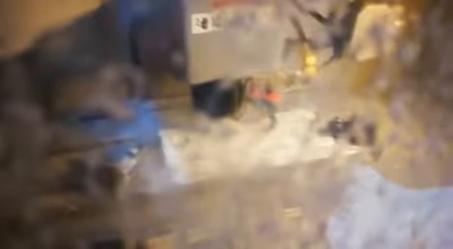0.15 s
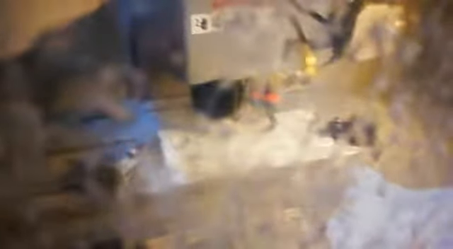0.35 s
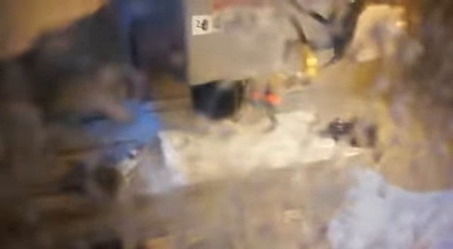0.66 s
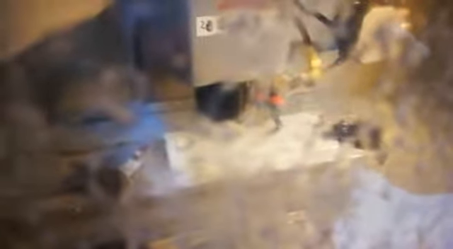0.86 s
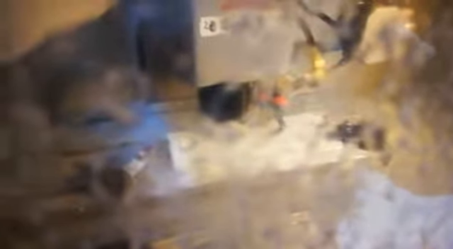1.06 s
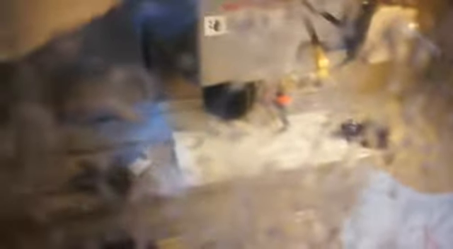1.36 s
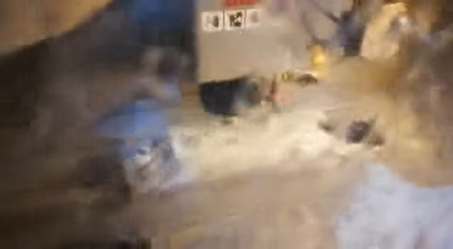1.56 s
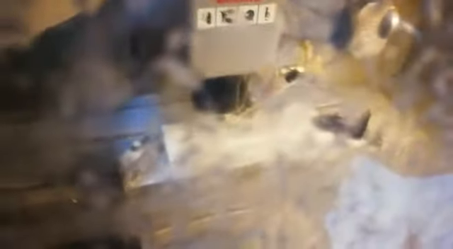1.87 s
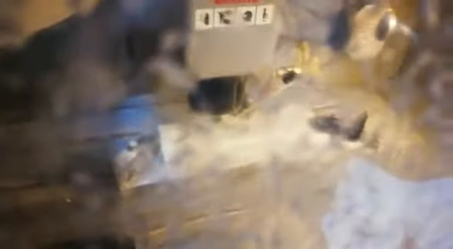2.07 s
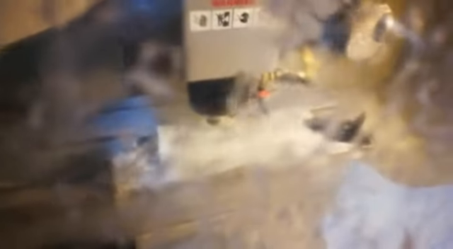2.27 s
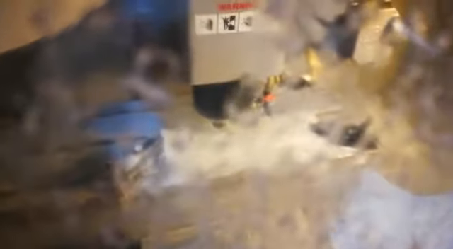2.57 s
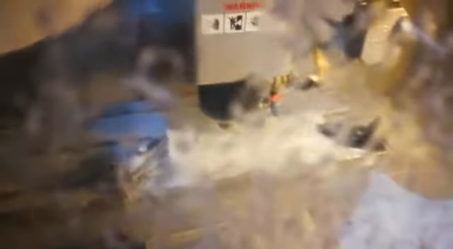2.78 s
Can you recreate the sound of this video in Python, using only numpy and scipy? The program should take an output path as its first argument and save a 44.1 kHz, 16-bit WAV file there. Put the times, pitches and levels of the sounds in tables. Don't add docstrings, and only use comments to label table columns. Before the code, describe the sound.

A machining centre idles with a deep electrical hum, thin motor whine and steady airy hiss.

```python
import sys
import numpy as np
from scipy import signal
from scipy.fft import rfft, irfft, next_fast_len
from scipy.io import wavfile

SR = 44100
rng = np.random.default_rng(int(sys.argv[2]) if len(sys.argv) > 2 else 0)


def volts_from_db(level):
    exponent = np.asarray(level, float) / 20
    return 10 ** exponent


def generate_wav(signal):
    frames = np.transpose(np.atleast_2d(signal))
    scaled = np.clip(frames, -1, 1) * 32767
    pcm = np.round(scaled).astype(np.int16)
    wavfile.write(sys.argv[1], SR, pcm)


N = 128772
T = np.arange(N) / SR

# frequency in Hz, density in dB per Hz.
AIR_SPECTRUM = [(25, -30), (60, -23), (110, -17.5), (300, -13.5), (480, -22.5), (3100, -28), (13500, -31),
                (15700, -38)]
# frequency in Hz, width in Hz, lift in dB.
HISS_BUMPS = [(100, 16, 13), (148, 27, 4.5), (269, 70, 8.5), (344, 29, 5), (1320, 83, 5),
              (2060, 470, 5.5), (2800, 530, -2.5), (4400, 350, 2), (4720, 200, 0.5), (8710, 2150, 7.5),
              (13100, 1200, 0.5)]
# frequency in Hz, left minus right in dB.
AIR_BALANCE = [(300, -1.5), (700, 5.5), (1290, 7), (2400, 2), (4400, 5.8), (8100, 0), (15000, 6.5)]
# time in s, air flow in dB, coolant spray in dB.
FLOW = [
    (0, 0.6, -56),
    (.5, 0.04, -63),
    (1.3, 0.9, -50),
    (1.6, 1.2, -41.5),
    (2.1, 0.45, -40.5),
    (2.4, 0.2, -46),
    (2.92, 1, -45),
]
OTHER_HZ = [346.2, 358.5, 950, 1123.5, 1220, 1445, 1776, 2014.6, 3678.25, 3765.4, 3810.5, 4422.5]
# left peak in dB, right peak in dB, left lead in rad.
OTHER_LEVELS = [(-42, -46, .7), (-46, -42, 1.1), (-53, -59, .2), (-52, -60, -2.3), (-52, -60, .3),
                (-47.5, -55, 2.9), (-55, -60, .6), (-52.5, -59, .1), (-47.5, -53, .3), (-50.5, -54, -1.2),
                (-61, -61, .1), (-56, -60, 1.7)]
# shaft order, left peak in dB, right peak in dB.
PUMP_ORDERS = [(1, -58, -57), (3, -56, -54), (5, -47, -49), (7, -39.5, -41), (8, -46, -46), (9, -50, -53),
               (11, -50, -52), (12, -51, -60), (13, -55.5, -55)]
# shaft order, left peak in dB, right peak in dB, left lead in rad.
WHINE_ORDERS = [(82, -54, -68, 1.6), (83, -66, -61, .1), (85, -56, -55, 1.9), (86, -62, -60, .1),
                (87, -58, -60, 2.8), (88, -49, -46, 2.0), (89, -41, -51, -.3), (90, -48, -41, -.9),
                (91, -50, -53, -1.2), (92, -45, -45, 1.6), (93, -51, -50, -2.8), (94, -64, -60, .1),
                (173, -64, -59, .1), (174, -56, -59, .8), (175, -50.5, -54, -.7), (176, -56, -51, .8),
                (177, -53, -57, -2.2), (178, -57, -52, .5), (179, -61, -53, 1.8), (180, -59, -57, 1.4),
                (181, -53, -59, 1.7), (182, -58, -54, 2.4), (183, -53, -49, -1.5), (184, -59, -54, 2.3),
                (185, -56, -63, -1.2), (186, -58, -57, -2.3), (187, -53, -57, .7), (189, -63, -62, .1)]
# order of twice the mains, left peak in dB, right peak in dB, beat in Hz,
# time in step in s.
BUZZ_ORDERS = [(4, -44, -46, 1.26, 2.7), (5, -52, -59, .36, 1.4), (6, -51.5, -57, .42, 1.0),
               (7, -47, -51, .45, .95), (8, -55, -60, .7, .6), (9, -51, -60, .9, 2.2),
               (10, -50, -58, .46, .82), (11, -56, -55, .8, .5), (12, -55, -56, .6, .4),
               (13, -45, -57, .42, 1.6), (14, -51, -57, .72, 2.8), (15, -55, -54, .8, .9),
               (16, -60, -58, .6, 1.4), (17, -57, -61, .7, 1.7), (18, -53, -59, 1.05, 1.72),
               (19, -59, -59, .8, 2.1), (20, -55, -54, 1.6, 1.62), (21, -56, -60, .45, 1.9)]
# frequency in Hz, time in step with the first tone in s.
HUM_TONES = [
    [(100.01, 0), (99.21, 1.02), (100.48, 2.06)],
    [(200.43, 0), (199.94, .845), (201.27, .284)],
    [(300.01, 0), (293.36, .0644), (300.9, .72), (300.49, .255)],
]
# left peak in dB, right peak in dB, left lead in rad.
HUM_LEVELS = [
    [(-20.2, -20.5, 0.074), (-42.5, -37.5, .14), (-42.5, -42, .04)],
    [(-22, -22.5, -0.035), (-28.5, -26.5, -0.064), (-36, -39.5, -0.22)],
    [(-26.5, -30, 0.26), (-32, -30.5, .33), (-40, -36, 0.16), (-40, -39.5, 0.079)],
]

TWICE_MAINS_HZ, SHAFT_HZ = 100.2, 48.891
CREST_TURNS = 0.29
AIR_DB, SWELL_DB, FLICKER_DB = -31, 0.3, 0.6
ALIKE_HZ, ALIKE_SLOPE = 372, 4.5
TURN_DEPTH, TREBLE_FADE_DB_PER_S = 0.06, 0.8
SPRAY_HZ, SPRAY_WIDTH_OCTAVES = 2250, 0.82
SLOT_ORDER, SLOT_LAG_RAD = 90, 0.8
SECOND_SCATTER_RAD = 1.1
THIRD_DB, THIRD_SCATTER_DB = -66, 2.8


def walk(rate_hz, count=1):
    place = T * rate_hz
    k = place.astype(int)
    x = rng.standard_normal((count, k[-1] + 2))
    blend = np.sin(np.pi / 2 * (place - k)) ** 2
    return 1.4 * (x[:, k] + (x[:, k + 1] - x[:, k]) * blend)


def read(table, hz):
    table_hz, value = np.array(table).T
    return np.interp(np.log(hz), np.log(table_hz), value)


def tone(hz, left_db, right_db, lead_rad, start_rad, waver_db, rate_hz, slip_rad):
    w = walk(rate_hz, count=4)
    right = volts_from_db(right_db) / (volts_from_db(left_db) + volts_from_db(right_db))
    lead = lead_rad * np.array([[right], [right - 1]])
    phase = 2 * np.pi * hz * T + start_rad + lead + slip_rad * w[2:]
    level_db = np.array([[left_db], [right_db]]) + waver_db * w[:2]
    return volts_from_db(level_db) * np.cos(phase)


def fan_air():
    size = next_fast_len(N)
    hz = np.maximum(np.arange(size // 2 + 1) * SR / size, 1)
    db = read(AIR_SPECTRUM, hz)
    for bump_hz, width_hz, lift_db in HISS_BUMPS:
        db = db + lift_db * np.exp(-0.5 * ((hz - bump_hz) / (width_hz / 2)) ** 2)
    alike = 1 / (1 + (hz / ALIKE_HZ) ** ALIKE_SLOPE)
    mid, side = rfft(rng.standard_normal((2, size)))
    pair = np.sqrt(1 + alike) * mid + np.sqrt(1 - alike) * side * np.array([[1], [-1]])
    pair = pair * volts_from_db(db + read(AIR_BALANCE, hz) * np.array([[0.5], [-0.5]]))

    time_s, flow_db, _ = np.array(FLOW).T
    swell_db = SWELL_DB * walk(2.48) + np.interp(T, time_s, flow_db)
    turn = 1 + TURN_DEPTH * np.cos(2 * np.pi * (SHAFT_HZ * T - CREST_TURNS))
    fade = volts_from_db(-TREBLE_FADE_DB_PER_S * T)
    out = 0
    for step in range(8, 30):
        share = np.cos(np.pi / 2 * np.clip(2 * np.log2(hz) - step, -1, 1)) ** 2
        band = irfft(pair * share, size)[:, :N] * volts_from_db(swell_db + FLICKER_DB * walk(9.16))
        if step > 25:
            band = band * turn * fade
        out = out + band
    return out * volts_from_db(AIR_DB) / np.std(out)


def coolant_spray():
    hz = np.maximum(np.arange(N // 2 + 1) * SR / N, 1)
    shape = np.exp(-0.5 * (np.log2(hz / SPRAY_HZ) / SPRAY_WIDTH_OCTAVES) ** 2)
    hiss = irfft(rfft(rng.standard_normal((2, N))) * shape, N)
    time_s, _, spray_db = np.array(FLOW).T
    level_db = np.interp(T, time_s, spray_db) + 1.2 * walk(12) + np.array([[1.5], [-1.5]])
    return hiss / np.std(hiss) * volts_from_db(level_db)


def other_machines():
    return sum(tone(hz, *row, start_rad=hz, waver_db=1.5, rate_hz=2.5, slip_rad=0.25)
               for hz, row in zip(OTHER_HZ, OTHER_LEVELS))


def pump_pulses():
    return sum(tone(k * SHAFT_HZ, left, right, k * 0.19, k * k, waver_db=4.5, rate_hz=5.14, slip_rad=0.35)
               for k, left, right in PUMP_ORDERS)


def slot_whine():
    out = 0
    scatter = SECOND_SCATTER_RAD * rng.standard_normal(len(WHINE_ORDERS))
    for (k, left, right, lead), off in zip(WHINE_ORDERS, scatter):
        start = off * (k > 100) - SLOT_LAG_RAD * (k == SLOT_ORDER) - 2 * np.pi * k * CREST_TURNS
        out = out + tone(k * SHAFT_HZ, left, right, lead, start, waver_db=1.3, rate_hz=3, slip_rad=0.2)
    for k in range(259, 280):
        chance = rng.standard_normal(4)
        left, right = THIRD_DB + THIRD_SCATTER_DB * chance[:2]
        lead, start = 2 * chance[2:]
        out = out + tone(k * SHAFT_HZ, left, right, lead, start, waver_db=3.0, rate_hz=2.6, slip_rad=0.4)
    return out


def drive_buzz():
    out = 0
    for k, left, right, beat_hz, step_s in BUZZ_ORDERS:
        lead, start = rng.uniform(-np.pi, np.pi, 2)
        order = tone(k * TWICE_MAINS_HZ, left, right, lead, start, waver_db=1.6, rate_hz=7, slip_rad=0.35)
        out = out + order * (1 + 1.2 * np.cos(2 * np.pi * beat_hz * (T - step_s)))
    return out


def transformer_hum():
    out = 0
    for group, levels in zip(HUM_TONES, HUM_LEVELS):
        first_hz = group[0][0]
        for (hz, step_s), (left, right, lead) in zip(group, levels):
            phase = 2 * np.pi * (first_hz * step_s + hz * (T - step_s))
            phase = phase + np.array([[0.5], [-0.5]]) * lead
            out = out + volts_from_db(np.array([[left], [right]])) * np.cos(phase)
    return out


def scene():
    hiss = fan_air() + coolant_spray()
    motor = pump_pulses() + slot_whine()
    return hiss + other_machines() + motor + drive_buzz() + transformer_hum()


def low_pass(x):
    return signal.sosfilt(signal.butter(12, 15690, fs=SR, output="sos"), x)


def record(dry):
    return low_pass(dry)


dry = scene()
out = record(dry)
generate_wav(out)
```